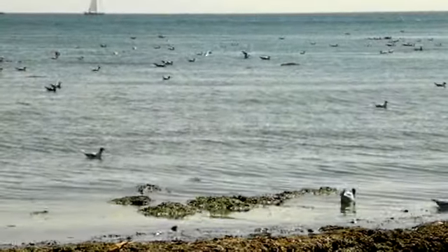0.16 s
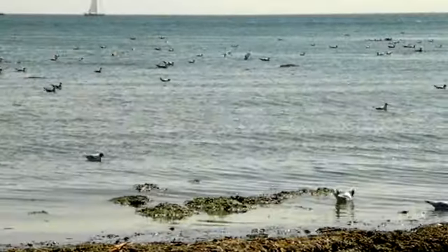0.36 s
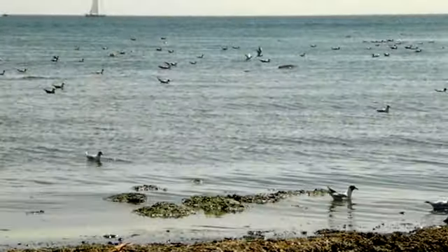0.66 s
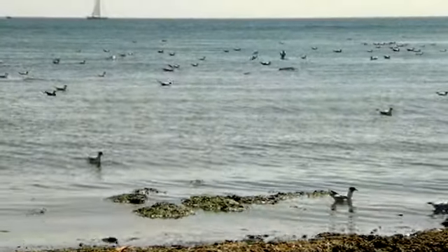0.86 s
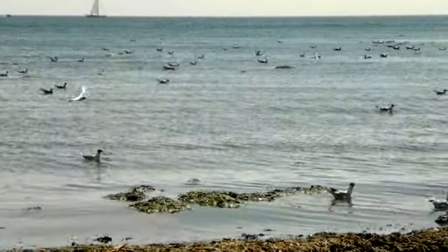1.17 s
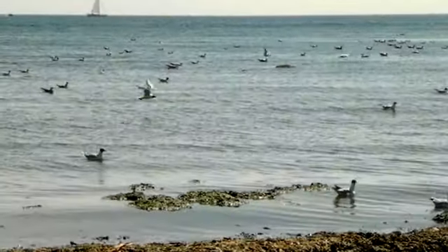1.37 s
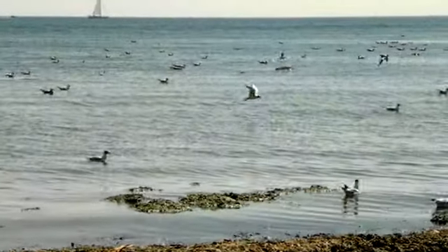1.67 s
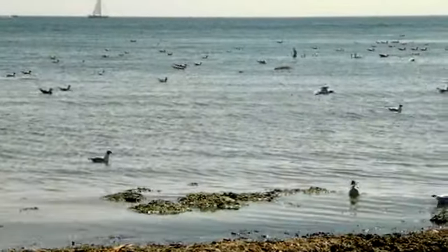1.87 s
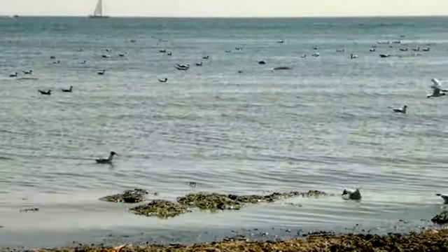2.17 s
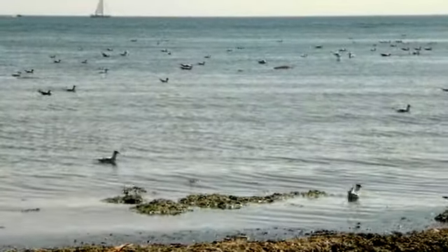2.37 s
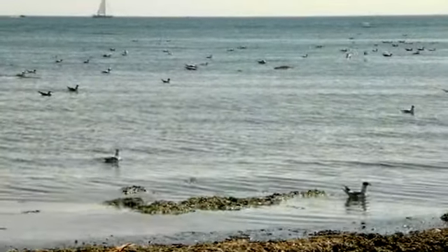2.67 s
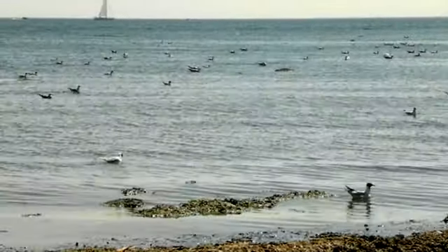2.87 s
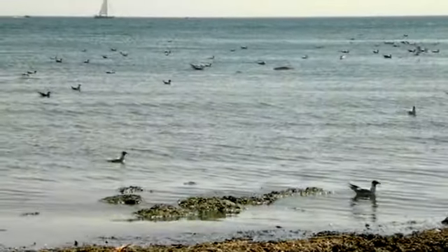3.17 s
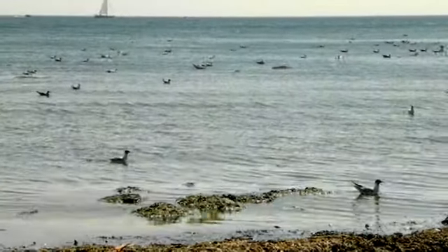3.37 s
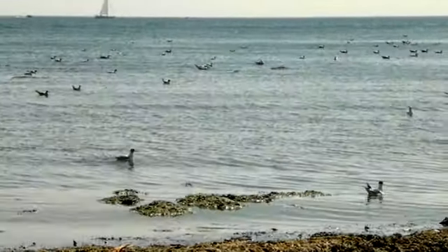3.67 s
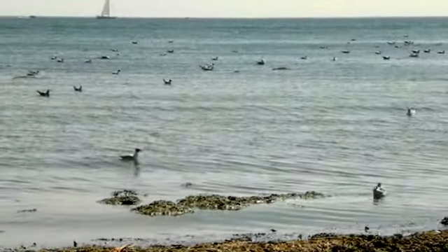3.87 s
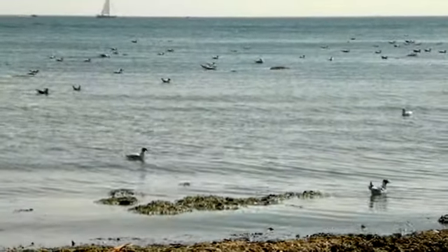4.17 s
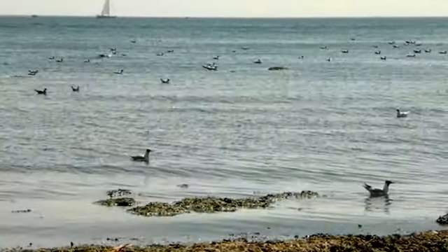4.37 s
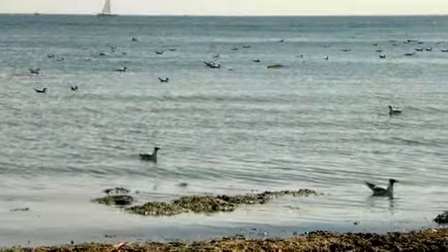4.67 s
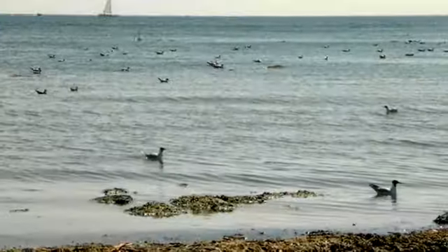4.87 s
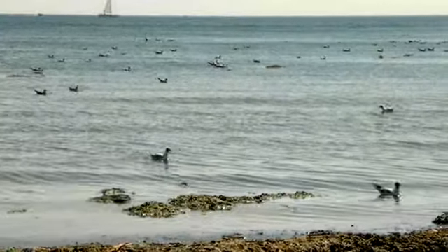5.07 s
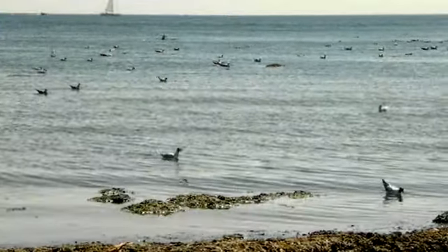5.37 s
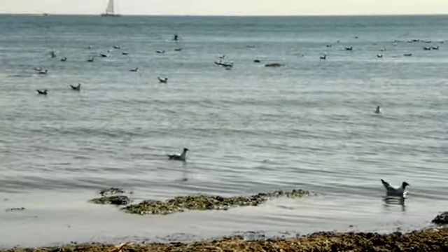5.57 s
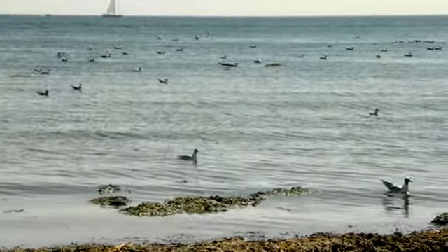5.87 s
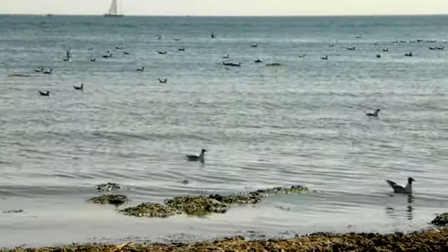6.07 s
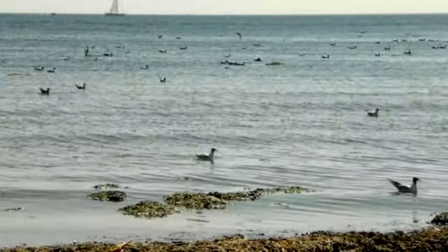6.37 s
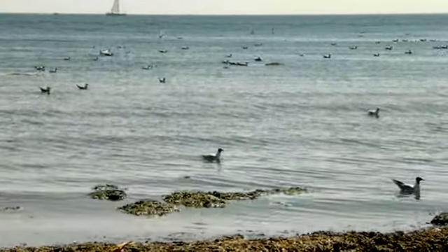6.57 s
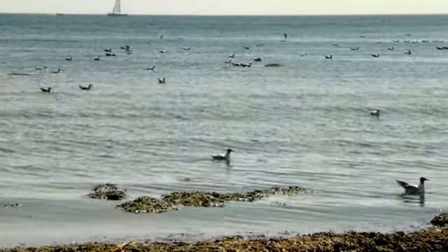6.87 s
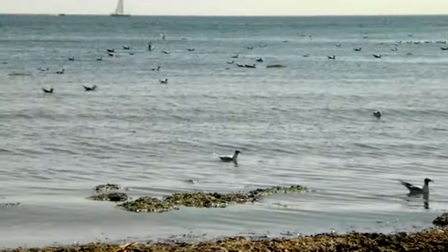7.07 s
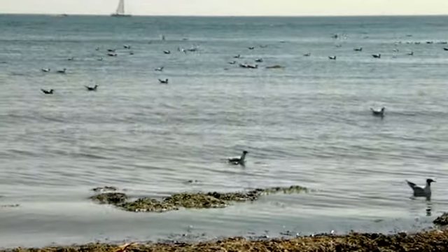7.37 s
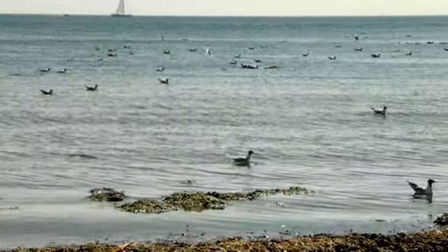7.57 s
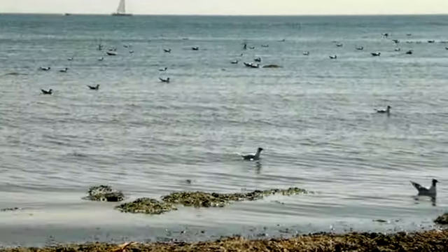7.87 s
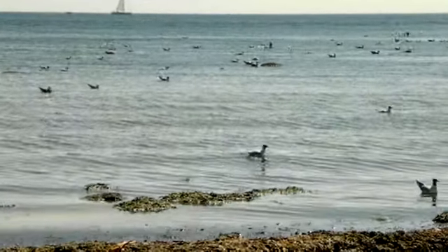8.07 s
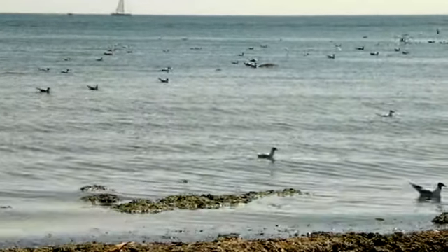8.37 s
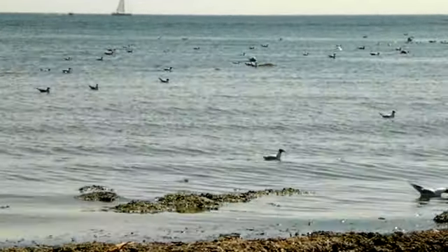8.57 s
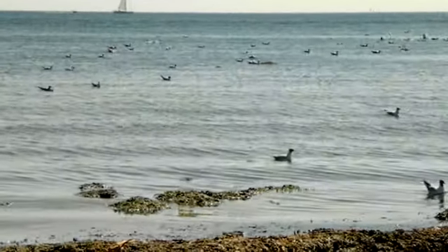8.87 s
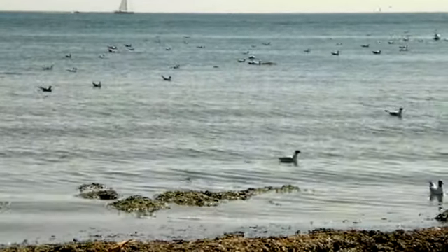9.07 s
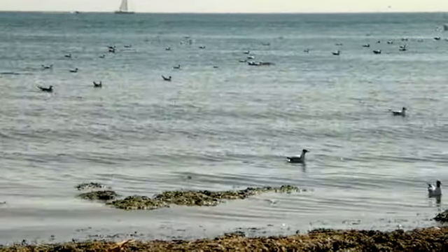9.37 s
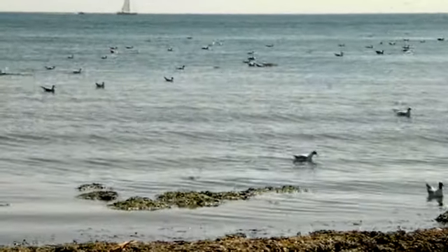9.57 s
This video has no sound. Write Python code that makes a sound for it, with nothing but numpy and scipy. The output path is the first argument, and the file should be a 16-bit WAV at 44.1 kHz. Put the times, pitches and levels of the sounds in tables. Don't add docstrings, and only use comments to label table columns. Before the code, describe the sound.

Outdoors on a beach, a scattered gull flock calls over quiet lapping water. Sparse barks, mews and whistles come first, then two hard plastic clicks close to the microphone. A long grating rasp follows midway, then another click, strong double barks, a warbling trill and bright chirps. Distant birds form a constant hoarse chatter, with faint wavelet slaps, water hiss and low wind rumble.

```python
import sys
import numpy as np
from scipy import signal
from scipy.fft import rfft, irfft
from scipy.io import wavfile
from scipy.ndimage import uniform_filter1d, minimum_filter1d

SR = 44100
rng = np.random.default_rng(int(sys.argv[2]) if len(sys.argv) > 2 else 0)


def to_linear_factor(level_db):
    exponent = np.asarray(level_db, float) / 20
    return 10 ** exponent


def log_audio(samples):
    frames = np.atleast_2d(samples).T
    limited = np.clip(frames, -1, 1)
    pcm = np.round(limited * 32767).astype(np.int16)
    wavfile.write(sys.argv[1], SR, pcm)


N = 428211

# (time [s], peak [dB], octave pitch [Hz], upper voice [dB], length [s])
BARKS = [(0.221, -32, 1990, -9.5, 0.061), (1.15, -20.5, 1707, -3, 0.055), (1.558, -41.5, 1937, 7.5, 0.071),
         (3.589, -32, 2000, -7.5, 0.045), (4.149, -31, 1834, -8.5, 0.067), (4.33, -44, 1736, -5, 0.037),
         (4.429, -34, 2020, -11.5, 0.044), (5.873, -21, 1713, -3.5, 0.052), (6.522, -19, 1610, -7.5, 0.061),
         (6.6516, -15, 1773, -4.5, 0.058), (7.369, -36.5, 1805, -0.5, 0.022),
         (7.625, -18.5, 1750, -8, 0.051), (8.9424, -16.5, 1817, -5, 0.071)]
# (frequency [Hz], gain [dB])
BARK_THROAT = [(800, -10.5), (1300, -25.5), (1750, 8.5), (2100, 10), (2500, 6), (2900, -18.5)]
BARK_UPPER_THROAT = [(3000, 12), (3450, 8), (4400, 4.5), (5200, -13.5), (6100, -9.5), (7100, -6.5),
                     (9000, -15), (15500, -41)]
BARK_THROBS_PER_HZ, BARK_DROP = .0475, 0.082
LEAD_IN_DB, BARK_HOLD, BARK_END_DB, BARK_TAIL_S = -17.5, 0.56, -24, 0.024

# (time [s], pitch [Hz], level [dB])
LONG_RASP = [
    [(4.654, 1900, -46), (4.68, 1780, -29), (4.715, 2000, -28), (4.74, 2100, -29), (4.775, 2250, -30),
     (4.786, 1700, -30.5)],
    [(4.815, 1806, -25), (4.835, 2054, -18.5), (4.86, 1850, -23.5), (4.87, 1700, -30), (4.882, 2248, -24),
     (4.893, 2007, -23), (4.93, 2150, -21), (4.95, 1650, -31)],
    [(4.971, 2045, -21), (4.982, 1750, -30), (4.994, 2050, -22.5), (5.005, 1850, -20), (5.016, 1650, -31),
     (5.039, 2150, -26), (5.05, 1900, -25), (5.065, 1718, -31.5), (5.115, 1900, -49)],
]
# (time [s], overtones [dB], shrill overtones [dB])
RASP_BEAK = [(4.654, -54, -62), (4.69, -46, -54), (4.77, -52, -64), (4.85, -46.5, -54), (4.95, -45, -49.5),
             (5.02, -43.5, -42), (5.06, -52, -53), (5.115, -63, -65)]
# (frequency [Hz], gain [dB])
LONG_RASP_THROAT = [(2800, -13), (3500, 6), (4050, -9), (4650, 1), (5100, -14)]
SHRILL_THROAT = [(5200, -12), (6200, 3), (7100, 1), (7700, -12), (9000, -14), (11500, -21), (14500, -27)]
RASP_THROBS_PER_S, RASP_SLOWING = 96, 21.5
RASP_CLIMB_HZ = 339.8
RASP_LOOP_LOW_HZ, RASP_LOOP_HZ, RASP_LOOP_DB = 1530, 800, -34

# (time [s], level [dB])
TRILL = [(7.75, -32), (7.775, -22), (7.95, -21.5), (8.05, -23.5), (8.12, -29), (8.19, -51)]
TRILL_FULL_DB, TRILL_LOW_HZ, TRILL_HZ_PER_DB = -19.5, 1750, 9
SWING_HZ, SWING_FULL_HZ, SWING_POWER = 282.7, 618, 3.2
LOOPS_PER_S, LOOPS_SLOW = 98, 75

# (time [s], pitch [Hz], level [dB], upper voice [dB])
CRIES = [
    [(2.05, 1090, -49, -8), (2.09, 1100, -41, -12), (2.17, 935, -44, -17)],
    [(3.24, 980, -45, -13), (3.3, 923, -43, -20), (3.355, 971, -43, -11), (3.37, 1005, -37.5, 3.5),
     (3.42, 1017, -37, 3), (3.5, 997, -36.5, 1.5), (3.515, 960, -39, -12), (3.58, 858, -44, -20)],
]
# (frequency [Hz], gain [dB])
CRY_THROAT = [(800, -17), (1400, -24.5), (1800, 23), (2250, 5), (2650, -24), (2900, -53)]
CRY_UPPER_THROAT = [(2700, 22), (3100, 0.5), (3600, 30.5), (4200, 14.5), (4800, 7), (5600, -31),
                    (7500, -17)]
# (time [s], pitch [Hz], level [dB], upper voice [dB])
CLEAR_CRY = [
    [(7.035, 775, -60, 8), (7.06, 849, -47, 11), (7.08, 913, -37, 6.5), (7.115, 960, -37, -2),
     (7.135, 1008, -36.5, -13), (7.185, 1020, -36, -18), (7.2, 960, -43, -10)],
    [(7.195, 925, -53, 7), (7.25, 842, -52, 9), (7.295, 770, -57, 1), (7.33, 720, -60, -6)],
]
# (frequency [Hz], gain [dB])
CLEAR_THROAT = [(700, -7), (1000, -13), (1400, -20), (1800, -6), (2100, 6), (2500, -6)]
CLEAR_UPPER_THROAT = [(2600, -15), (3000, -3), (3500, 10), (4200, -8), (4800, -7), (5400, -26), (6800, -32)]

# (time [s], length [s], octave pitch [Hz], peak [dB], upper voice [dB])
CROAKS = [
    (.99, 0.122, 1756, -39.5, -11),
]
# (time [s], length [s], octave pitch [Hz], peak [dB], upper voice [dB])
SLIDES = [(.8, 0.11, 2000, -51, -2), (.94, .21, 1900, -40.5, -7.5), (6.7, 0.15, 2202, -35.5, -3.5),
          (6.79, 0.22, 1810, -36, -13.5), (6.19, .3, 2150, -54, -29)]
# (time [s], length [s], octave pitch [Hz], peak [dB], upper voice [dB])
BUZZES = [(1.405, .145, 2000, -37, -40), (6.78, 0.223, 2250, -40, -14), (5.56, 0.18, 2300, -51.5, 4),
          (4.9, 0.117, 2500, -49, -30), (3.24, .37, 2000, -51, 3.5), (7.11, .09, 2300, -46.5, 4.5),
          (3.62, .5, 2050, -48, -3.5)]
# (frequency [Hz], gain [dB])
SLIDE_UPPER_THROAT = [(2800, 6), (3300, 9), (4500, 3.5), (5100, -16), (6200, -20), (8000, -30)]

# (time [s], level [dB], top voice [dB], throb rate [1/s])
SCREECHES = [
    [(2.89, -64, -3, 104), (2.91, -53, -4, 104), (2.958, -43, -6, 98), (3.026, -40, -12, 108),
     (3.09, -41.5, -9, 108), (3.14, -47, -10, 89), (3.195, -57, -2, 97)],
    [(7.45, -66, -6, 100), (7.482, -47.5, -7, 98), (7.536, -41, -3.5, 100), (7.612, -43.5, -3.5, 103),
     (7.66, -44.5, -4, 100), (7.72, -54, -8, 120), (7.745, -56, -8, 107)],
]
# (frequency [Hz], gain [dB])
SCREECH_THROAT = [(1400, 12), (2200, 11.5), (3400, -11), (4700, 3.5), (5750, 16.5), (6300, -11),
                  (6900, 13.5), (7600, -20)]
SCREECH_TOP_THROAT = [(7800, 2), (9000, 14), (10300, 6), (11500, -8), (13500, -14)]
SCREECH_HZ, SCREECH_SAG_HZ_PER_S = 1165, 150
# (time [s], length [s], peak [dB], top voice [dB])
FAR_SCREECHES = [
    (2.239, 0.537, -56.5, -4),
    (5.219, .58, -53.5, -4.5),
]
# (frequency [Hz], gain [dB])
FAR_THROAT = [(4000, 0), (5000, 7.5), (6600, -1), (7500, 6)]
FAR_TOP_THROAT = [(8200, 12), (8800, 3), (9600, -18), (10500, 13.5), (11600, -20)]
# (time [s], length [s], start [Hz], end [Hz], peak [dB])
THIN_SCREECHES = [(8.15, 0.406, 8600, 8500, -58.5), (1.355, 0.037, 5700, 5400, -54),
                  (1.355, .02, 3000, 2700, -53), (.99, .05, 7500, 6600, -52), (1.044, .05, 7200, 7000, -56),
                  (6.81, .06, 6100, 5600, -54), (1.19, 0.076, 6200, 6200, -59),
                  (1.545, .03, 7200, 6900, -53), (4.5, .04, 3600, 3400, -49), (8.15, 0.39, 5800, 5700, -63),
                  (8.47, .3, 7300, 7200, -61)]

# (time [s], length [s], start [Hz], end [Hz], peak [dB])
WHISTLES = [(.145, 0.11, 3450, 3340, -51.5), (0.548, 0.2, 3180, 3100, -55.5),
            (.82, 0.06, 2820, 2900, -46.5), (0.828, .05, 1436, 1460, -49), (.51, 0.097, 5550, 5460, -58),
            (1.546, 0.026, 3520, 3585, -29), (3.974, 0.063, 4880, 4500, -53),
            (4.066, 0.086, 4230, 3830, -43), (4.535, 0.031, 3380, 3540, -48.5),
            (4.581, 0.038, 3670, 3710, -46.5), (5.3, 0.49, 2900, 2585, -52), (5.677, 0.11, 4080, 3950, -53),
            (6.033, .045, 4300, 3470, -53), (7.79, 0.17, 4060, 3880, -57.5),
            (8.478, 0.029, 6560, 7400, -47), (6.765, 0.064, 4420, 4110, -43),
            (6.81, 0.059, 3050, 2750, -42.5), (8.457, 0.023, 4100, 3700, -38),
            (8.79, 0.0394, 3560, 2690, -48), (8.855, 0.036, 4190, 4290, -50)]
# (time [s], length [s], held [Hz], end [Hz], peak [dB])
PIPINGS = [
    (7.394, 0.317, 3955, 3570, -41),
    (8.51, 0.292, 4030, 3630, -36),
]
# (time [s], pitch [Hz], level [dB])
ARCH = [(.39, 3750, -69), (.44, 3960, -49), (.5, 4170, -48), (.62, 4230, -51.5), (.7, 4130, -47),
        (.735, 3940, -53), (.75, 3600, -58)]
# (time [s], pitch [Hz], level [dB])
REEDY = [
    [(1.02, 4640, -61), (1.322, 4270, -49.5), (1.37, 4000, -70)],
    [(6.38, 4470, -75), (6.41, 4650, -63), (6.46, 4750, -59), (6.654, 4560, -50), (6.77, 4410, -50.5),
     (6.82, 4130, -67)],
]
# (time [s], pitch [Hz], level [dB])
CHIRPS = [
    [(1.6, 4020, -30.5), (1.65, 4890, -40), (1.678, 4260, -32), (1.692, 4350, -24.5), (1.717, 4380, -31.5),
     (1.815, 3290, -41)],
    [(8.48, 3960, -35), (8.504, 4530, -27.5), (8.516, 5155, -42), (8.54, 5190, -41), (8.562, 5030, -39),
     (8.58, 4610, -27.5), (8.615, 4790, -34), (8.632, 4390, -23), (8.75, 3410, -47)],
]
PURE_OCTAVE_DB, REEDY_OCTAVE_DB, CHIRP_OCTAVE_DB = -38, 0.5, -31
CHIRP_FULL_DB = -25
CHIRP_WOBBLE, CHIRP_SETTLE_S = .03, .07

# (time [s], length [s], start [Hz], end [Hz], peak [dB])
MEWS = [(0.257, 0.202, 1080, 1033, -42), (0.454, 0.28, 1100, 942, -41.5), (1.368, 0.026, 844, 810, -34.5),
        (1.393, 0.021, 838, 790, -32), (3.099, 0.084, 1114, 970, -38), (4.023, 0.16, 1054, 958, -43.5),
        (5.9, 0.12, 1065, 915, -39), (5.78, 0.12, 1134, 1117, -49), (.15, 0.1, 1070, 1200, -50),
        (6.8, .18, 900, 800, -33.5), (8.45, 0.207, 915, 1000, -46), (3.96, 0.046, 1000, 1100, -37.5),
        (9.09, 0.16, 933, 870, -45.5), (9.14, 0.11, 930, 880, -45.5), (9.265, 0.026, 920, 895, -38.5)]
# (time [s], length [s], start [Hz], end [Hz], peak [dB])
BRIGHT_MEWS = [
    (1.193, 0.0416, 947, 844, -34),
    (1.563, 0.0307, 1110, 1228, -25),
]
# (frequency [Hz], gain [dB])
BRIGHT_THROAT = [(1500, 5), (2200, 1), (2800, -5), (3500, -11), (4600, -11.5), (5800, -37), (7200, -28)]
# (time [s], pitch [Hz], sixth partial [dB])
WAILS = [
    [(2.6, 376.5, -49), (2.69, 373, -48), (2.85, 368.6, -52), (2.93, 408, -54)],
    [(7.95, 355, -48), (8.15, 363.4, -41.5), (8.44, 359.2, -45.5), (8.56, 372, -50), (8.7, 357, -60)],
    [(9.22, 350, -67), (9.27, 355.5, -50), (9.32, 358, -45), (9.5, 388, -43.5), (9.57, 419, -40),
     (9.71, 406, -42.5)],
]
# (frequency [Hz], gain [dB])
WAIL_THROATS = [
    [(1400, -28), (1900, 15), (2250, 8.5), (2650, -36), (3500, -34)],
    [(1000, -43), (1450, -11.5), (1800, -4), (2170, 6), (2530, -4.5), (2900, -40), (3600, -34)],
    [(700, -5.5), (1100, -17), (1500, 1.5), (1900, 11.5), (2300, 13), (2750, -12), (3600, -64)],
]
WARBLE_FROM_HZ, WARBLE_PER_S, WARBLE = 400, 27, 0.025

# (time [s], peak [dB], low ring [dB], crack [dB], shell ring [dB])
SNAPS = [(1.934, -53, -42.5, -66, -60), (2.1826, -2.5, -22, -13, -31), (2.5809, -4, -28, -9.5, -15.5),
         (5.359, -43, -39, -35, -53), (5.392, -13.5, -28, -24.5, -27.5), (5.7832, -33, -33.5, -59, -32.5),
         (9.2286, -54, -52, -36, -65)]
# (frequency [Hz], level [dB], t60 [s])
CASE = [(2241, 22.5, 0.0029), (1750, -1, 0.0062), (4170, -1, 0.0064)]
CASE_LOW = [(537, 20, 0.018), (721, 34.5, 0.011), (1036, 9, 0.029)]
SHELL = [(1073, 0, 0.016)]

# (time [s], level [dB])
FLOCK = [(0, -41.5), (.15, -46.5), (.6, -46), (.95, -38), (1.3, -45.5), (1.9, -47.5), (3.2, -46.5),
         (3.75, -41), (4.15, -43), (4.25, -48.5), (5.15, -45.5), (5.75, -44), (6.3, -47.5), (7.02, -42.5),
         (7.4, -45.5), (8.3, -45), (9.05, -47), (9.71, -40.5)]
# (frequency [Hz], density [dB per Hz])
BLUR = [(906, -9), (1130, -8), (2130, 3), (2900, -18), (6960, -25.5)]
# (frequency [Hz], density [dB per Hz])
LAP = [(120, -59), (200, -23.5), (358, -14.5), (906, 1), (1130, -10)]
LAP_DB, FLOCK_USUAL_DB, CHURN = -54, -45, 0.99
# (time [s], level [dB])
WASH = [(0, -67), (.75, -58.5), (1.5, -61.5), (2.4, -53.5), (3.1, -64.5), (3.8, -59.5), (4.6, -68),
        (7.8, -61.5), (9.3, -67), (9.71, -52.5)]
# (frequency [Hz], density [dB per Hz])
SLAP = [(190, -28), (260, -2.5), (350, 3.5), (500, -1.5), (700, -10.5)]
# (frequency [Hz], density [dB per Hz])
HISS = [(6960, -26), (7900, -29), (8820, -28.5), (12700, -33), (15500, -33.5)]
HISS_DB = -65.5
# (time [s], level [dB])
GUSTS = [(0, -63), (.4, -68), (.95, -70), (1.1, -63.5), (1.7, -54), (2.46, -51), (3.03, -53.5), (3.19, -67),
         (5.9, -72), (6.65, -68), (6.84, -66), (7.952, -54.5), (8.52, -67.5), (9.4, -60.5), (9.71, -51.5)]
# (frequency [Hz], density [dB per Hz])
WIND = [(20, -15), (45, -12.5), (70, -3), (110, -2.5), (140, -5.5), (180, -22), (260, -19)]

NOTCH_HZ, NOTCH_WIDTH_HZ = 7820, 490
HEADROOM, TOP_HZ = 1.3, 15700
BUSY_DB, BUSY_S, BUSY_TOP_HZ = -33, .07, 13300
TOP_LOUD_DB = -70


def gain_at(shape, hz):
    f, db = np.transpose(shape)
    return to_linear_factor(np.interp(np.log(hz), np.log(f), db, left=-90, right=-90))


def noise(shape):
    hz = np.linspace(1, SR / 2, (N + 1) // 2 + 1)
    x = irfft(rfft(rng.standard_normal(N + 1)) * gain_at(shape, hz))[:N]
    return x / x.std()


def walk(rate):
    k = max(int(SR / rate), 1)
    x = uniform_filter1d(uniform_filter1d(rng.standard_normal(N), k), k)
    return x / x.std()


def curve(rows):
    return np.interp(np.arange(N) / SR, *np.transpose(rows))


def play(rows, fade_s=0.003):
    s, *columns = np.transpose(rows)
    i = np.arange(int(s[0] * SR), min(int(s[-1] * SR), N))
    edge = np.clip(np.minimum(i - i[0], i[-1] - i) / (fade_s * SR), 0, 1)
    return i, edge, [np.interp(i / SR, s, c) for c in columns]


def note(s, length, start_hz, end_hz, db, sag=1.095, scoop=0., scoop_share=.1, peak=.5, attack_db=6, release_db=6):
    u = np.linspace(0, 1, 41)
    hz = start_hz + (end_hz - start_hz) * u ** sag
    hz = hz * (1 - scoop * np.exp(-u / scoop_share))
    attack = attack_db * (1 - u / peak) ** 2
    release = release_db * ((u - peak) / (1 - peak)) ** 2
    return np.transpose([s + u * length, hz, db - np.where(u < peak, attack, release)])


def angle(hz):
    return 2 * np.pi * np.cumsum(hz) / SR


def stack(hz, throat):
    first = max(int(throat[0][0] / hz.max()), 1)
    k = np.arange(first, int(throat[-1][0] / hz.min()) + 1)[:, None]
    gain = gain_at(throat, k * hz[::16])
    gain = gain / np.sqrt(np.sum(gain ** 2, 0) / 2)
    gain = np.repeat(gain, 16, axis=1)[:, :len(hz)]
    return np.sum(gain * np.sin(k * angle(hz) + k * k), 0)


def syrinx(i, hz, chance, rate, sweep, depth, rough, flutter_db=3.0, hop=0., skew=0.88):
    slow, fast = chance[0][i], chance[1][i]
    turns = np.cumsum(rate * (1 + .08 * slow)) / SR
    phase = turns % 1
    held = fast[np.searchsorted(turns, np.floor(turns))]
    held = uniform_filter1d(held, size=160)
    flutter = held[::-1] if hop else slow[::-1]
    opening = 1.686 * np.sin(np.pi * phase ** skew) ** 1.11
    gate = (1 - depth + depth * opening) * to_linear_factor(flutter_db * flutter)
    pitch = hz * (1 - sweep * np.cos(np.pi * phase) + rough * fast + hop * np.tanh(1.38 * held))
    return pitch, gate


def voice(i, hz, chance, upper_db, throat, upper_throat, **membrane):
    hz, gate = syrinx(i, hz, chance, **membrane)
    return gate * (stack(hz, throat) + to_linear_factor(upper_db) * stack(hz, upper_throat))


def barks(chance):
    out = np.zeros(N)
    for s, peak_db, hz, upper_db, length in BARKS:
        db = peak_db - 11.0
        rate = BARK_THROBS_PER_HZ * hz
        end = s + length
        rows = [(s - 1 / rate, db + 2 * LEAD_IN_DB), (s - .002, db + LEAD_IN_DB / 2), (s + 0.0015, db),
                (s + BARK_HOLD * length, db), (end, db + BARK_END_DB), (end + BARK_TAIL_S, db + 2 * BARK_END_DB)]
        i, edge, (swell_db,) = play(rows)
        hz = hz * (1 - BARK_DROP * np.clip((i / SR - s) / length, 0, 1.5) ** 1.63)
        main = voice(i, hz / 2, chance, upper_db, BARK_THROAT, BARK_UPPER_THROAT,
                     rate=rate, sweep=-.015, depth=1.0, rough=0.013, flutter_db=2.0, skew=0.66)
        other = voice(i, .64 * hz, chance, upper_db - 0.5, BARK_THROAT, BARK_UPPER_THROAT,
                      rate=rate, sweep=0.064, depth=0.69, rough=0.051, flutter_db=1.5, skew=0.66)
        out[i] += edge * to_linear_factor(swell_db) * (main + to_linear_factor(-1.5) * other)
    return out


def long_rasp(chance):
    s, pitch_hz, level_db = np.vstack(LONG_RASP).T
    i, edge, (upper_db, shrill_db) = play(RASP_BEAK)
    rate = RASP_THROBS_PER_S - RASP_SLOWING * (i - i[0]) / SR
    phase = np.cumsum(rate) / SR % 1
    middle_s = i / SR + (.5 - phase) / rate
    db = np.interp(middle_s, s, level_db)
    arch = np.sin(np.pi * phase ** 1.3)
    shake = chance[1][i]
    gate = 1.35 * np.sin(np.pi * phase) ** 0.85
    hz = np.interp(middle_s, s, pitch_hz) + RASP_CLIMB_HZ * (arch - .75)
    hz = hz * (1 + .009 * shake)
    loop_hz = (RASP_LOOP_LOW_HZ + RASP_LOOP_HZ * arch) * (1 + .03 * shake[::-1])
    x = to_linear_factor(db) * np.sqrt(2) * np.sin(angle(hz))
    x += to_linear_factor(np.minimum(db - 2.0, RASP_LOOP_DB)) * np.sqrt(2) * np.sin(angle(loop_hz))
    x += to_linear_factor(upper_db) * stack(hz / 5 * (1 + .04 * shake), LONG_RASP_THROAT)
    x += to_linear_factor(shrill_db) * stack(hz / 2 * (1 + .03 * shake), SHRILL_THROAT)
    out = np.zeros(N)
    out[i] = edge * gate * x
    return out


def trill(chance):
    i, edge, (db,) = play(TRILL)
    low_hz = TRILL_LOW_HZ + TRILL_HZ_PER_DB * (db - TRILL_FULL_DB)
    swing_hz = SWING_HZ + SWING_FULL_HZ * to_linear_factor(db - TRILL_FULL_DB) ** SWING_POWER
    rate = LOOPS_PER_S - LOOPS_SLOW * (i - i[0]) / SR
    phase = np.cumsum(rate * (1 + 0.039 * chance[0][i])) / SR % 1
    arch = np.sin(np.pi * phase ** 1.3)
    turn = angle((low_hz + swing_hz * arch) * (1 + 0.0226 * chance[1][i]))
    gate = np.interp(phase, [0, .3, .58, .8, 1], [0.12, 1.55, 0.65, 0.89, 0.16])
    gate = uniform_filter1d(gate, size=40)
    line = np.sin(turn) + to_linear_factor(-29) * (1 - arch) * np.sin(2 * turn) + to_linear_factor(-36) * arch * np.sin(3 * turn)
    out = np.zeros(N)
    out[i] = edge * to_linear_factor(db) * gate * line
    return out


def cries(chance):
    out = np.zeros(N)
    for rows in CRIES:
        i, edge, (hz, db, upper_db) = play(rows)
        out[i] += edge * to_linear_factor(db) * voice(i, hz, chance, upper_db, CRY_THROAT, CRY_UPPER_THROAT,
                                         rate=62, sweep=.014, depth=.85, rough=.017, flutter_db=1.5)
    for rows, hoarse in zip(CLEAR_CRY, (2.7, 1.5)):
        i, edge, (hz, db, upper_db) = play(rows)
        out[i] += edge * to_linear_factor(db) * voice(i, hz, chance, upper_db, CLEAR_THROAT, CLEAR_UPPER_THROAT,
                                         rate=70, sweep=.008, depth=.3 * hoarse, rough=.007 * hoarse)
    return out


def short_rasps(chance):
    out = np.zeros(N)
    croak = dict(rate=52, sweep=.04, depth=.9, rough=.02, hop=.04)
    slide = dict(rate=89, sweep=.04, depth=.5, rough=.025, hop=.035)
    buzz = dict(rate=95, sweep=.1, depth=.6, rough=.07, hop=.06)
    for rows, drop, throb in ((CROAKS, .06, croak), (SLIDES, .15, slide), (BUZZES, .04, buzz)):
        second = dict(throb, sweep=0.051, rough=0.047, hop=-0.0504)
        for s, length, top_hz, peak_db, upper_db in rows:
            end_hz = top_hz * (1 - drop)
            call = note(s, length, top_hz, end_hz, peak_db, sag=.8, peak=.4, attack_db=3, release_db=3)
            i, edge, (hz, db) = play(call)
            main = voice(i, hz / 2, chance, upper_db - 4.0, CRY_THROAT, SLIDE_UPPER_THROAT, **throb, flutter_db=1.5)
            other = voice(i, .43 * hz, chance, upper_db + 6, CRY_THROAT, SLIDE_UPPER_THROAT, **second)
            out[i] += edge * to_linear_factor(db) * (main + to_linear_factor(-9.5) * other)
    return out


def screeches(chance):
    out = np.zeros(N)
    for rows in SCREECHES:
        i, edge, (db, top_db, rate) = play(rows, fade_s=0.006)
        hz = SCREECH_HZ - SCREECH_SAG_HZ_PER_S * (i - i[0]) / SR
        main = voice(i, hz, chance, top_db, SCREECH_THROAT, SCREECH_TOP_THROAT,
                     rate=rate, sweep=0.036, depth=.9, rough=0.035, flutter_db=1.5)
        other = voice(i, .62 * hz, chance, top_db, SCREECH_THROAT, SCREECH_TOP_THROAT,
                      rate=rate, sweep=0.05, depth=0.97, rough=0.0615)
        out[i] += edge * to_linear_factor(db) * (main + to_linear_factor(-3) * other)
    return out


def thin_screeches(chance):
    out = np.zeros(N)
    for row in THIN_SCREECHES:
        i, edge, (hz, db) = play(note(*row, peak=.5, attack_db=4, release_db=4))
        hz, gate = syrinx(i, hz, chance, rate=110, sweep=0.015, depth=0.74, rough=0.03)
        out[i] += edge * gate * to_linear_factor(db) * np.sin(angle(hz))
    return out


def whistles(chance):
    out = np.zeros(N)
    pure = [note(*row, sag=1.2, peak=.6, attack_db=5, release_db=4) for row in WHISTLES]
    pure += [note(*row, sag=9.5, scoop=.065, scoop_share=.07, peak=.4, attack_db=9, release_db=8)
             for row in PIPINGS]
    pure.append(ARCH)
    for calls, octave_db in ((pure, PURE_OCTAVE_DB), (REEDY, REEDY_OCTAVE_DB)):
        for rows in calls:
            i, edge, (hz, db) = play(rows)
            turn = angle(hz * (1 + 0.0029 * chance[1][i]))
            out[i] += edge * np.sqrt(2) * to_linear_factor(db) * (np.sin(turn) + to_linear_factor(octave_db) * np.sin(2 * turn))
    return out


def chirps(chance):
    out = np.zeros(N)
    for rows in CHIRPS:
        i, edge, (hz, db) = play(rows)
        wobble = CHIRP_WOBBLE * np.exp((i[0] - i) / SR / CHIRP_SETTLE_S) * chance[1][i + SR // 8]
        turn = angle(hz * (1 + 0.0029 * chance[1][i] + wobble))
        octave = to_linear_factor(CHIRP_OCTAVE_DB + (db - CHIRP_FULL_DB) / 5) * np.sin(2 * turn)
        out[i] += edge * np.sqrt(2) * to_linear_factor(db) * (np.sin(turn) + octave)
    return out


def mews(chance):
    out = np.zeros(N)
    shape = dict(sag=1.5, peak=.35, attack_db=4, release_db=5)
    for row in BRIGHT_MEWS:
        i, edge, (hz, db) = play(note(*row, **shape))
        out[i] += edge * to_linear_factor(db) * stack(hz * (1 + 0.015 * chance[1][i]), BRIGHT_THROAT)
    for row in MEWS:
        i, edge, (hz, db) = play(note(*row, **shape))
        out[i] += edge * to_linear_factor(db) * voice(i, hz, chance, -36.0, CRY_THROAT, CRY_UPPER_THROAT,
                                         rate=90, sweep=.004, depth=.15, rough=.004, flutter_db=1.5)
    return out


def wails(chance):
    out = np.zeros(N)
    for rows, throat in zip(WAILS, WAIL_THROATS):
        i, edge, (hz, db) = play(rows, fade_s=0.005)
        pushed = np.clip((hz - WARBLE_FROM_HZ) / 8, 0, 1)
        hz = hz * (1 + WARBLE * pushed * np.sin(2 * np.pi * WARBLE_PER_S * i / SR))
        level = to_linear_factor(db + 8.0 + 0.63 * chance[0][i])
        out[i] += edge * level * stack(hz * (1 + 0.0076 * chance[1][i]), throat)
    return out


def far_screeches(chance):
    out = np.zeros(N)
    for s, length, peak_db, top_db in FAR_SCREECHES:
        call = note(s, length, 560, 555, peak_db, peak=0.48, attack_db=6, release_db=8)
        i, edge, (hz, db) = play(call, fade_s=0.012)
        out[i] += edge * to_linear_factor(db) * voice(i, hz, chance, top_db, FAR_THROAT, FAR_TOP_THROAT,
                                         rate=120, sweep=0.046, depth=0.38, rough=0.076)
    return out


def snaps():
    out, t = np.zeros(N), np.arange(2048) / SR
    rise = 1 - np.exp(-t / 0.0031)
    crack_band = signal.butter(2, (3500, 10500), "band", fs=SR)
    crack_fade = np.exp(-t / 0.00045) + to_linear_factor(-11.0) * np.exp(-t / 0.00098)

    def ring(modes):
        x = rise * sum(to_linear_factor(db) * np.sin(2 * np.pi * hz * t) * 1000. ** (-t / t60) for hz, db, t60 in modes)
        x = x + 0.26 * np.roll(x, int(0.00342 * SR))
        return x / np.abs(x).max()

    for s, db, low_db, crack_db, shell_db in SNAPS:
        crack = signal.lfilter(*crack_band, rng.standard_normal(len(t))) * rise * crack_fade
        snap = to_linear_factor(db) * ring(CASE) + to_linear_factor(low_db + 6.5) * ring(CASE_LOW)
        snap += to_linear_factor(crack_db + 18.5) * crack + to_linear_factor(shell_db) * ring(SHELL)
        out[int(s * SR):][:len(t)] += snap
    return out


def far_flock(count=9):
    out = np.zeros(N)
    for _ in range(count):
        drift = 1.6 * np.tanh(walk(3.5) / 1.6)
        chance = walk(40.5), walk(700)
        hz, gate = syrinx(np.arange(N), 950 * (1 + 0.15 * drift), chance,
                          rate=97, sweep=0.0069, depth=0.61, rough=.035)
        turn = angle(hz)
        bird = to_linear_factor(-24.0) * np.sin(turn) + np.sin(2 * turn) + np.sin(3 * turn) + to_linear_factor(-3.5) * np.sin(4 * turn)
        out += gate * to_linear_factor(6.1 * walk(4.6)) * bird
    return out / out.std()


def flock_blur():
    return to_linear_factor(curve(FLOCK)) * (to_linear_factor(-5.5) * far_flock() + to_linear_factor(2 * walk(31.0)) * noise(BLUR))


def water():
    lap_db = LAP_DB + CHURN * (curve(FLOCK) - FLOCK_USUAL_DB)
    lapping = to_linear_factor(lap_db + 2 * walk(15.0)) * noise(LAP)
    return lapping + to_linear_factor(HISS_DB + 0.23 * walk(11)) * noise(HISS)


def wash():
    return to_linear_factor(curve(WASH) - 1.5 + 2.9 * walk(15.5)) * noise(SLAP)


def wind():
    return to_linear_factor(curve(GUSTS) + 2 * walk(22)) * noise(WIND)


def scene():
    chance = walk(45), walk(652)
    sources = (barks, long_rasp, trill, cries, short_rasps, screeches, thin_screeches,
               whistles, chirps, mews, wails, far_screeches)
    birds = sum(source(chance) for source in sources)
    t = np.arange(8192) / SR
    smear = rng.standard_normal(len(t)) * 1000. ** (-t / .15) * to_linear_factor(-40)
    birds = birds + signal.fftconvolve(birds, smear)[:N]
    return (birds + snaps() + flock_blur() + water() + wash() + wind())[None]


def band_limit(x):
    return signal.sosfilt(signal.butter(12, 16800, fs=SR, output="sos"), x)


def record(dry):
    x = np.tanh(HEADROOM * dry) / HEADROOM
    x = signal.lfilter(*signal.iirnotch(NOTCH_HZ, NOTCH_HZ / NOTCH_WIDTH_HZ, SR), x)
    x = signal.sosfilt(signal.ellip(8, .2, 60, TOP_HZ, fs=SR, output="sos"), x)
    hold = int(BUSY_S * SR)
    busy = minimum_filter1d(uniform_filter1d(x ** 2, hold // 2), hold) > to_linear_factor(2 * BUSY_DB)
    busy = np.minimum(4 * uniform_filter1d(1. * busy, hold), 1)
    top = signal.sosfiltfilt(signal.ellip(8, .01, 50, BUSY_TOP_HZ, "high", fs=SR, output="sos"), x)
    faint = uniform_filter1d(top ** 2, hold // 3) < to_linear_factor(2 * TOP_LOUD_DB)
    faint = uniform_filter1d(1. * faint, hold // 8)
    return band_limit(x - busy * faint * top)


dry = scene()
out = record(dry)
log_audio(out)
```